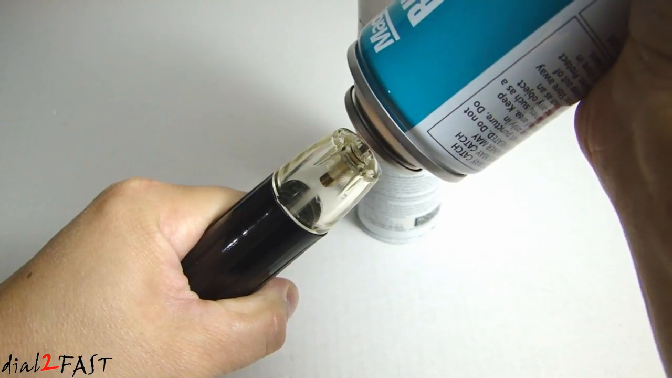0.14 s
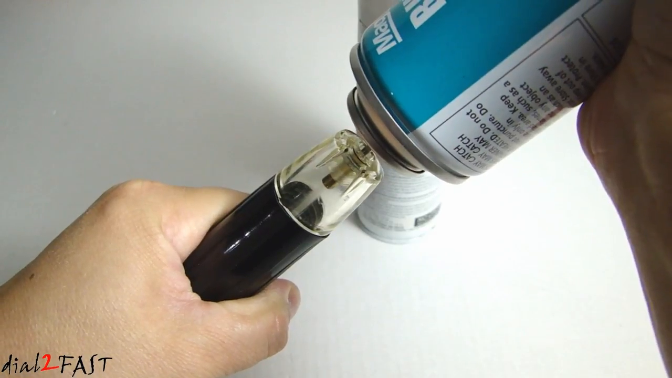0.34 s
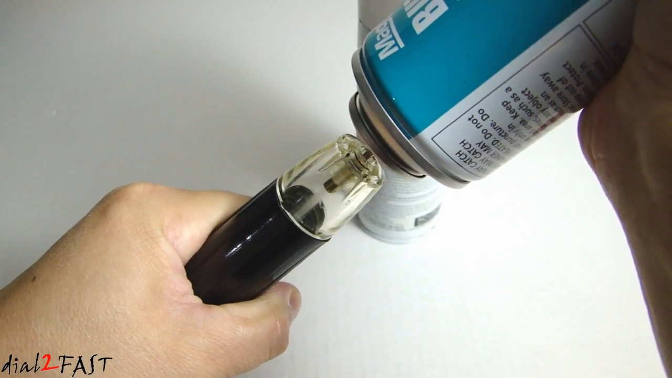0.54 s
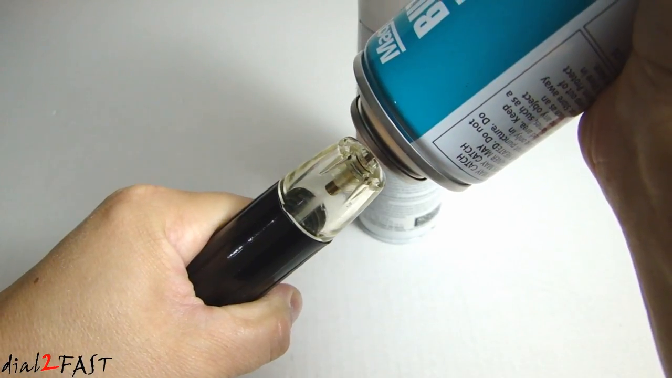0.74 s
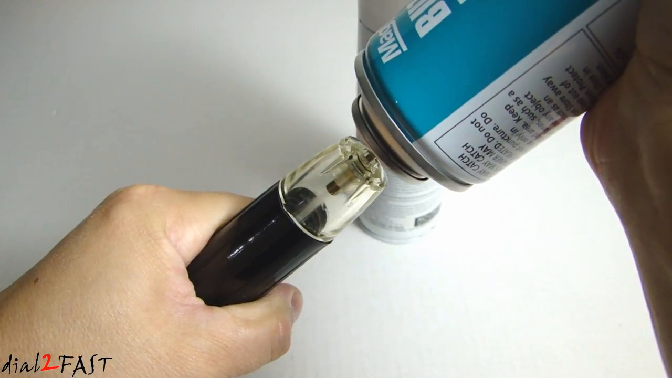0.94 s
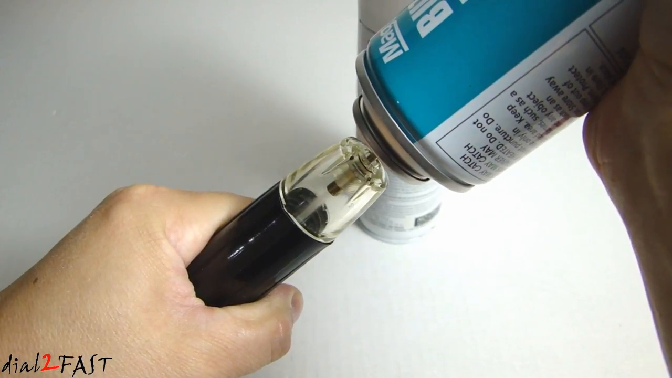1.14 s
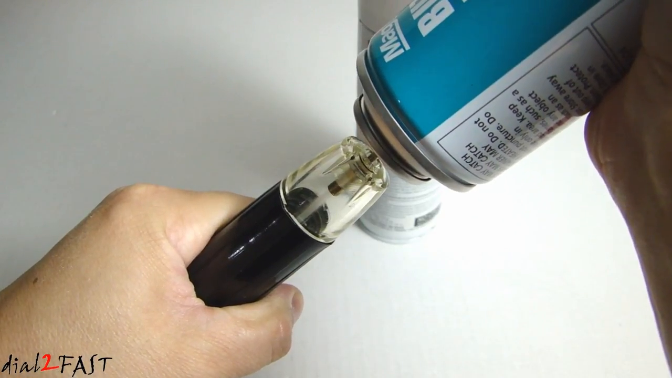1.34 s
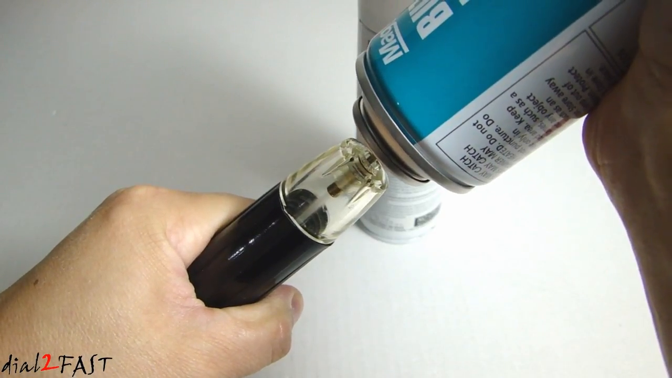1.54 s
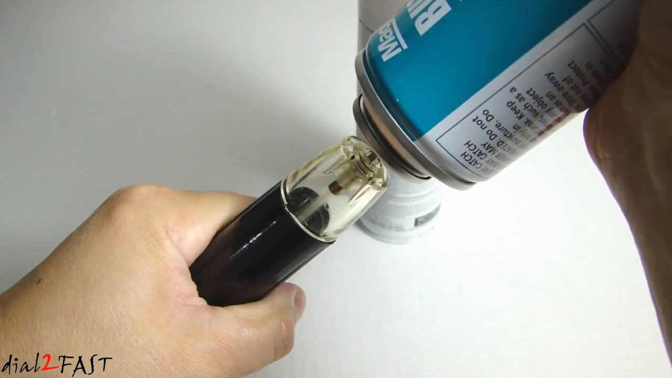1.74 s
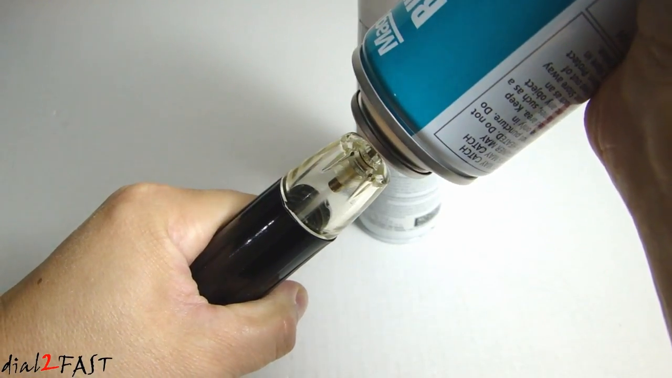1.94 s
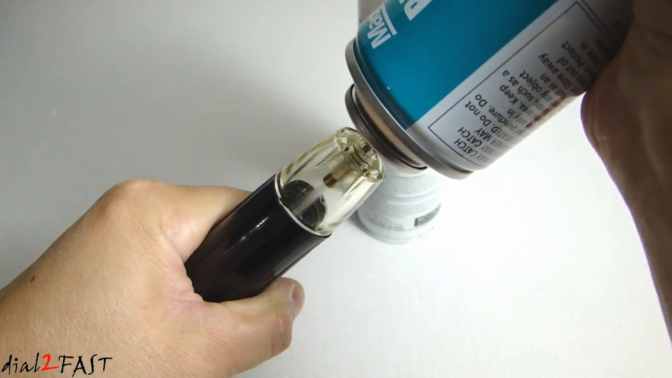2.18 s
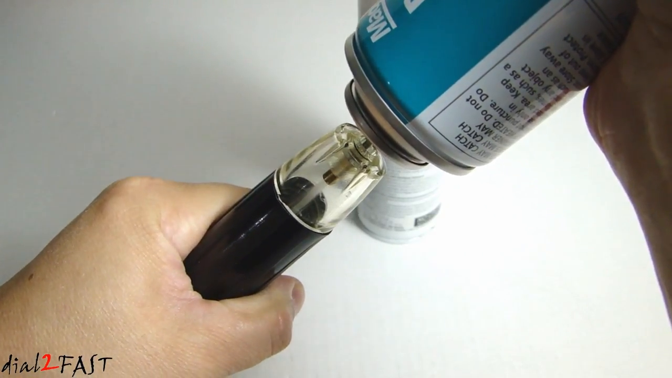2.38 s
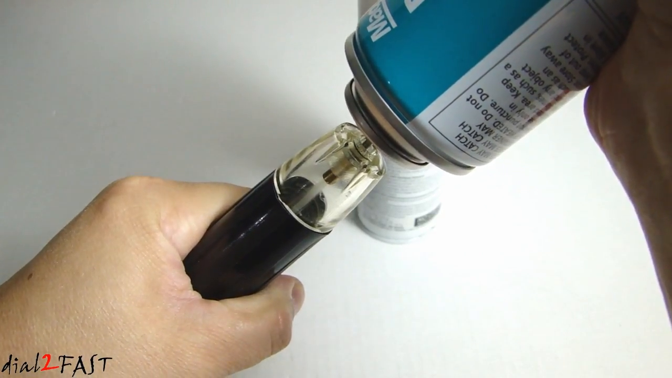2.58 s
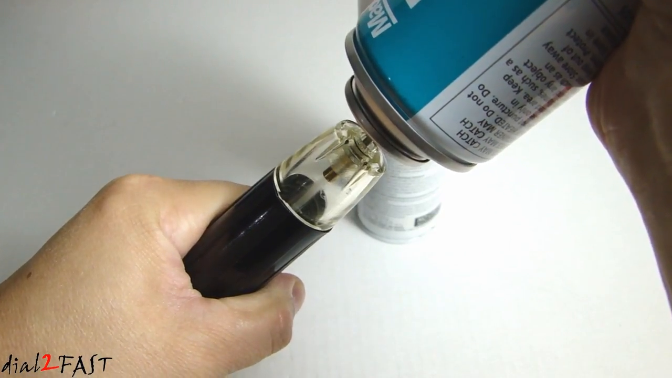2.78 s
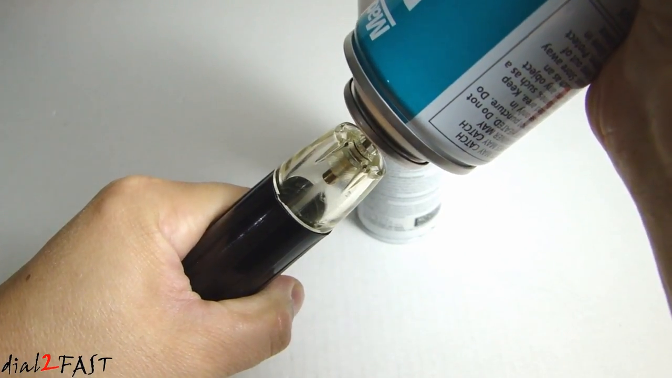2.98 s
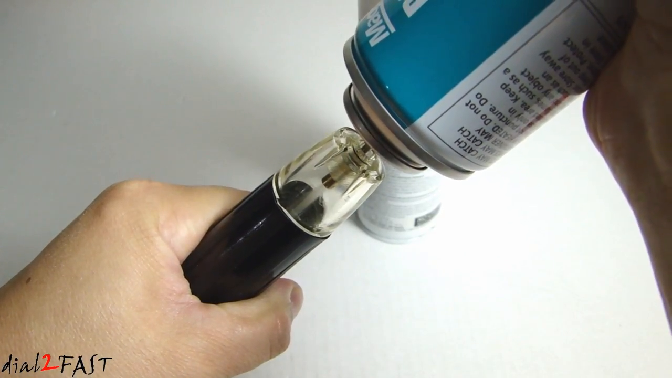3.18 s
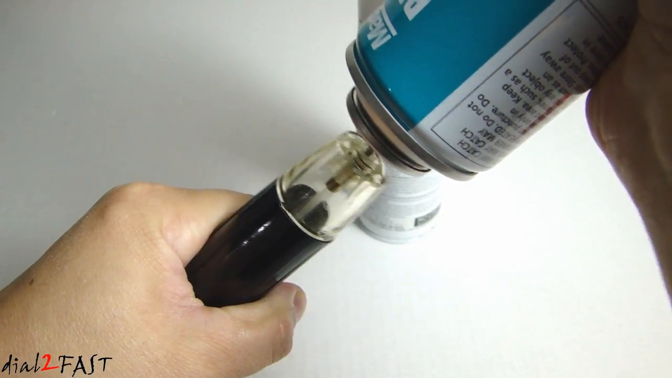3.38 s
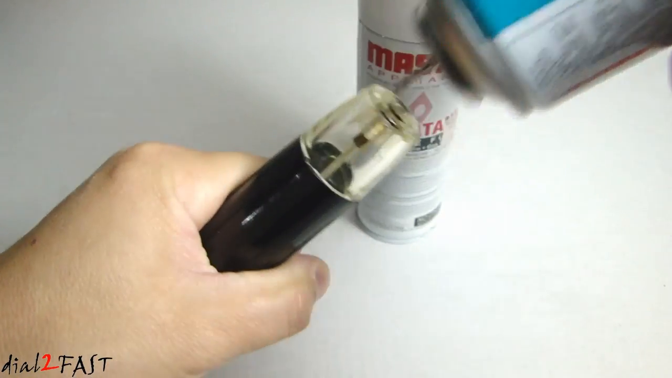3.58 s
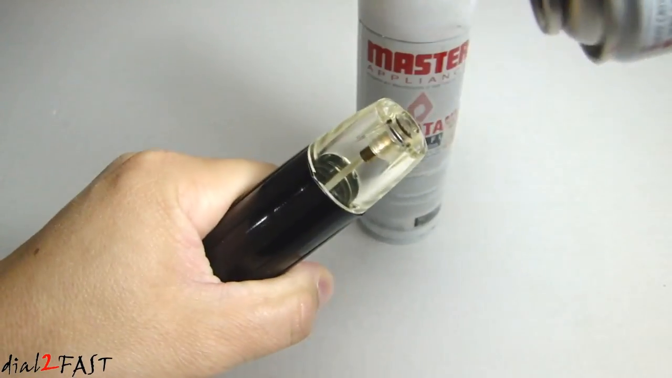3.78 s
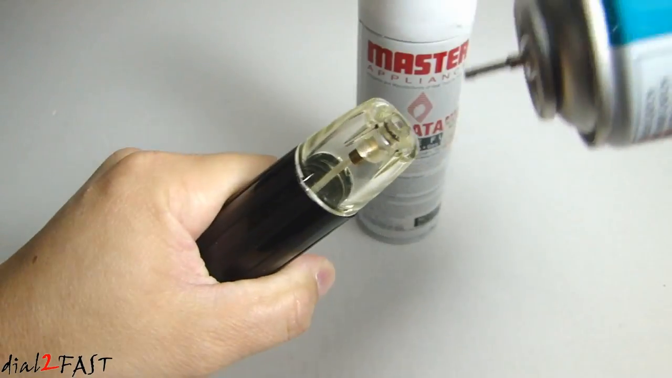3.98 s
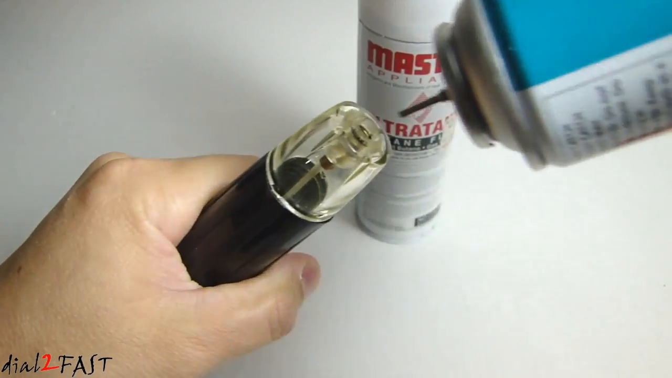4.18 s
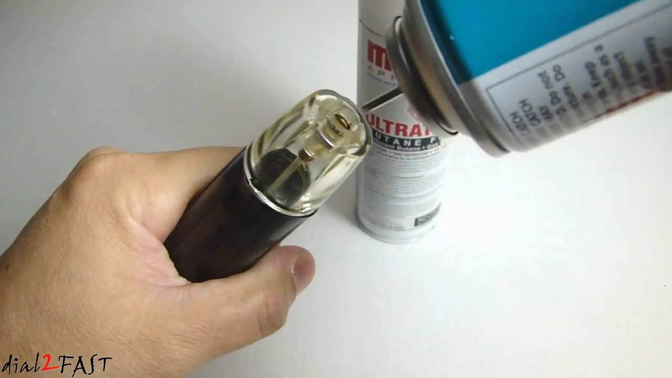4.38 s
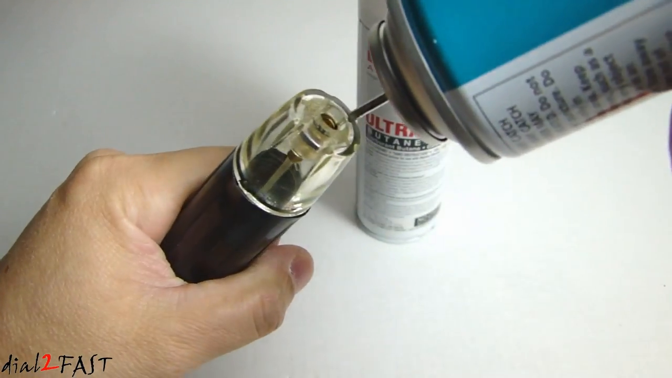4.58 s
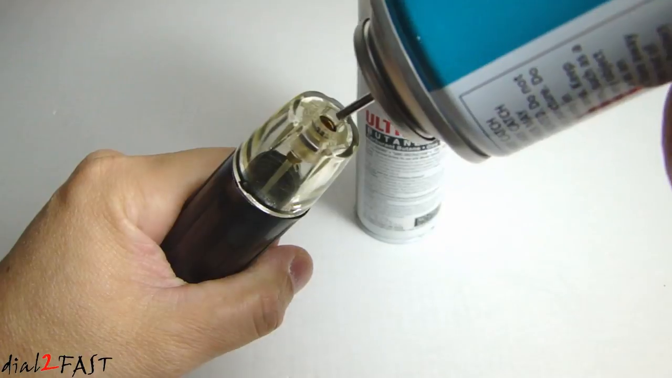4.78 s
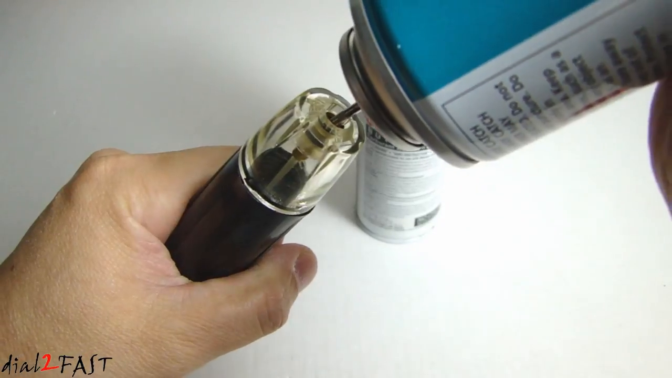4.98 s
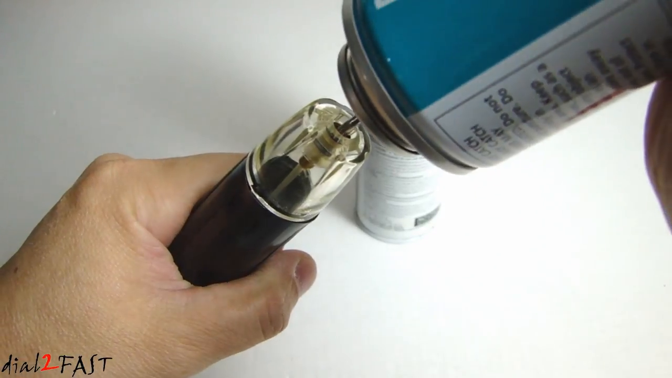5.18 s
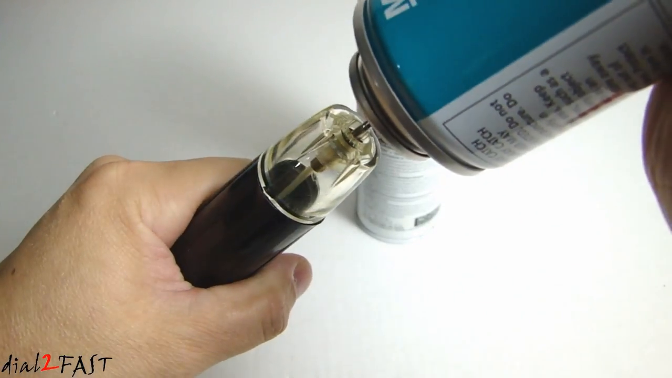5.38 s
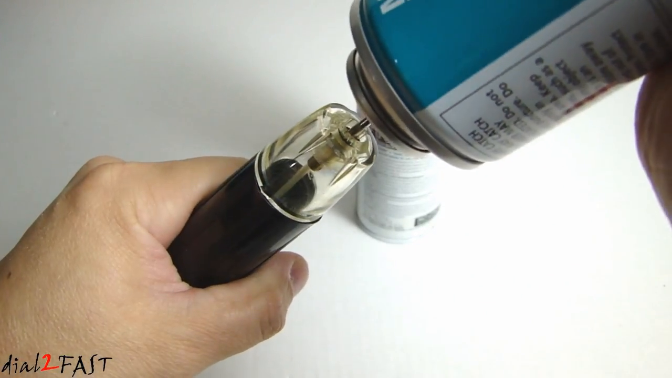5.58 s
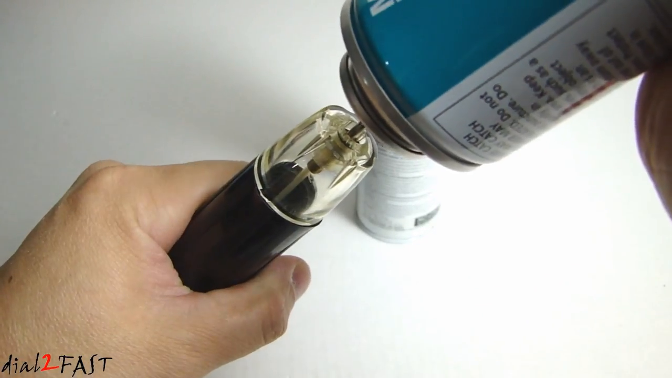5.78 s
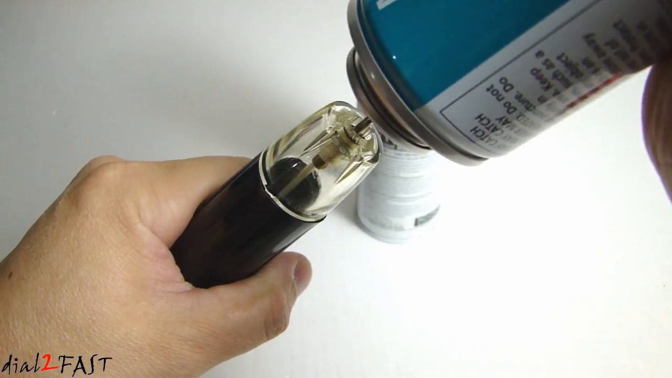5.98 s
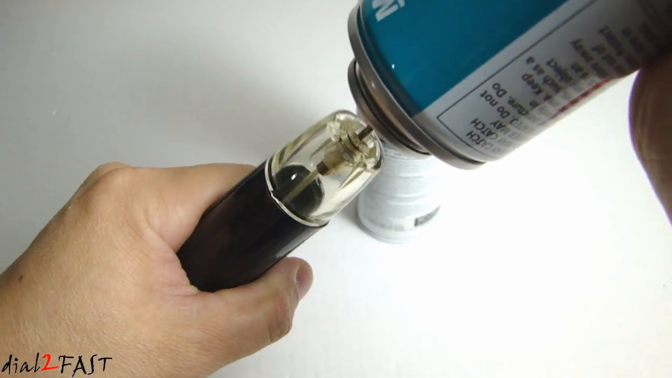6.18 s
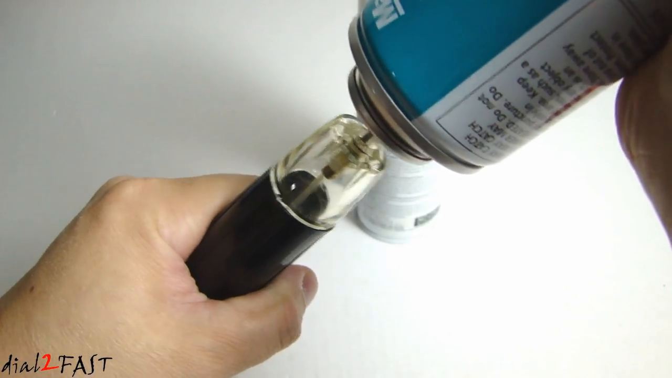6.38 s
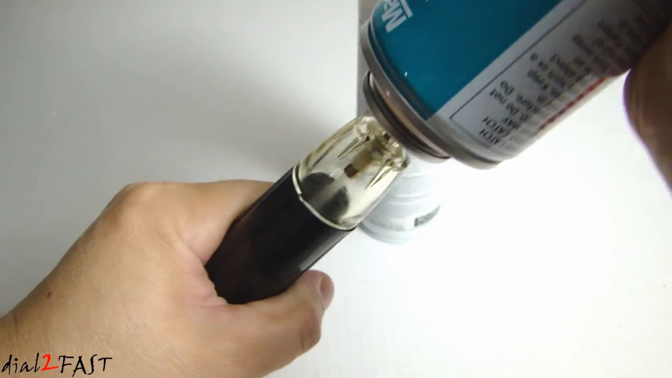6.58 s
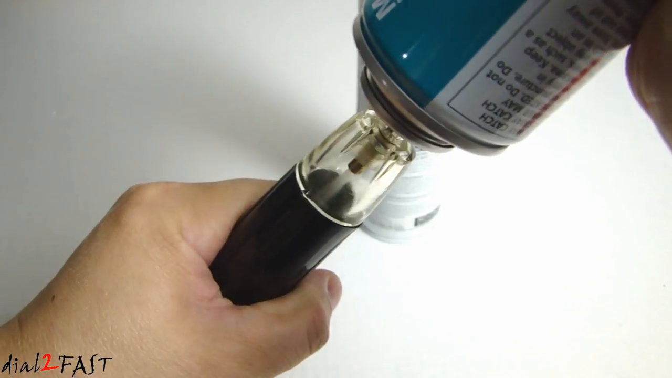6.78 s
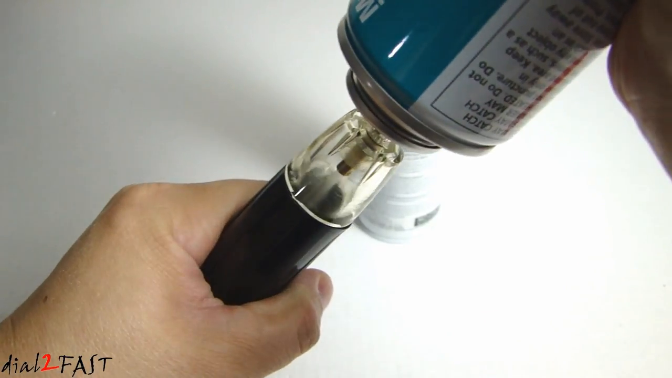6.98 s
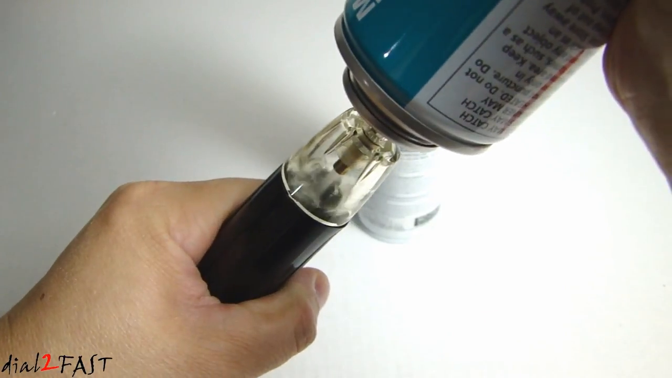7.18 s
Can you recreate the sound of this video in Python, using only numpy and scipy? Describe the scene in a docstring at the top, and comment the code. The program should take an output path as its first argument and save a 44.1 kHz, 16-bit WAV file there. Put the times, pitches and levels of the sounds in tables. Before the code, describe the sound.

Bright gas hiss from a can on a torch valve spurts and snaps off, soft taps follow in quiet, then hissing bursts back louder.

```python
"""In a quiet room, close to the microphone, a butane can is pressed onto the refill valve of a hand torch.
Gas leaks round the nozzle as a hiss: noise coloured by the small cavities that it rings.
It spurts as the can is pulled off, and the valve snaps shut with a crack and a short ring.
The nozzle taps its way back in, spurts again as it seats, and hisses louder when it is pushed home.
Drops of liquid gas puff now and then, and soft room noise lies underneath."""
import sys
import numpy as np
from scipy import signal
from scipy.fft import rfft, irfft
from scipy.io import wavfile

SR = 44100
rng = np.random.default_rng(int(sys.argv[2]) if len(sys.argv) > 2 else 0)


def put_to_file(sound):
    """Save the sound as 16-bit audio at rate SR, in the file named by the first command-line argument."""
    columns = np.atleast_2d(sound).T  # one column per channel
    safe = np.clip(columns, -1, 1)
    whole_steps = np.round(safe * 32767)
    wavfile.write(sys.argv[1], SR, whole_steps.astype(np.int16))


N = 319284
TIME = np.arange(N) / SR
FREQ = np.fft.rfftfreq(N, 1 / SR)
SIDES = np.array([[1], [-1]])  # left, right
TOP_HZ = 13150  # upper limit of the recorder
# moments shared by the leak and the spurts
PULL_OPEN_S, PULL_SHUT_S, SHUTTING_DB_PER_S = 3.554, 3.588, 899.5
SEEP_S = 6.322  # first touch of the second filling


def undb(db):
    """Turn decibels into gain."""
    return 10 ** (np.asarray(db) / 20)


def unit(x):
    """Scale to an rms (average strength) of 1."""
    return x / np.sqrt(np.mean(x ** 2))


def over_hz(points):
    """Join (frequency [Hz], value) points with straight lines on a log-frequency axis."""
    hz, value = np.transpose(points)
    return np.interp(np.log(FREQ + 1), np.log(hz), value)


def noise(gain):
    """Noise of rms 1, shaped by a gain at each frequency."""
    return unit(irfft(rfft(rng.standard_normal(N)) * gain, N))


def walk(rate_hz):
    """Smooth random drift of rms 1, mostly slower than the given rate."""
    return noise(1 / (1 + (FREQ / rate_hz) ** 2))


def ease(s, takes_s):
    """A smooth move of the hand from 0 to 1, half done at time s."""
    progress = np.clip((TIME - s) / takes_s + .5, 0, 1)
    return (1 + np.sin(np.pi * progress - np.pi / 2)) / 2


def burst(open_s, close_s, rise_db_per_s, fall_db_per_s):
    """Gain that rises to 1 at open_s, holds, and falls from close_s."""
    early = np.maximum(open_s - TIME, 0)
    late = np.maximum(TIME - close_s, 0)
    return undb(-rise_db_per_s * early - fall_db_per_s * late)


def decay(t, t60):
    """Fading gain that drops 60 dB in t60 seconds."""
    return np.exp(-np.log(1000) * t / t60)


def fade(s, t60):
    """Gain that starts at time s and drops 60 dB in t60 seconds."""
    return (TIME >= s) * decay(np.maximum(TIME - s, 0), t60)


def pan(left_minus_right_db):
    """Gains of left and right that differ by the given decibels."""
    return undb(SIDES * left_minus_right_db / 2)


# colour of the seated jet: (frequency [Hz], relative level [dB])
SEATED_COLOUR = [(100, -47.5), (160, -30.5), (250, -18), (500, -17.5), (1000, -15), (2200, -5.5),
                 (3200, 0.5), (6000, -8), (9000, -7.5), (11500, -11.5), (12700, -4.5), (13100, -18)]
# cavities round the seated nozzle: (frequency [Hz], width [Hz], lift [dB])
SEATED_CAVITIES = [(714, 250, 8), (1086, 204, 7.5), (1650, 470, 5.5), (3090, 90.0, 1), (3230, 140.0, 3),
                   (4010, 370, 6.5), (4310, 75, 6.5), (4750, 140.0, 9), (4990, 450, 5), (5500, 310, 7),
                   (6300, 590, 5.5), (7120, 190, 6), (7890, 530, 10.5), (9520, 360, 16.5), (10400, 60.0, 3),
                   (10070, 150.0, 6.5), (10307, 360, 19), (10740, 240.0, 12), (10807, 88, 12.0),
                   (11170, 150.0, 14.5), (11590, 400, 20.5), (12140, 230, 8), (12440, 170.0, 11.5)]
# colour of the jet when the can leans: (frequency [Hz], relative level [dB])
LEANING_COLOUR = [(100, -48), (160, -33), (250, -14), (500, -14.5), (1000, -6.5), (2200, -5), (3200, 0.5),
                  (6000, -5), (9000, -7.5), (11500, -2.5), (12700, -6), (13100, -5)]
# cavities round the leaning nozzle: (frequency [Hz], width [Hz], lift [dB])
LEANING_CAVITIES = [(1560, 800, 4.5), (3360, 110, 3.12), (3825, 91, 4.8), (4065, 150.0, 9.9),
                    (4440, 200, 2.6), (4790, 90.0, 6.1), (4980, 140, 9.6), (5780, 290.0, 4.0),
                    (6310, 130, 5.6), (7760, 534, 7.9), (9380, 250, 8.7), (9900, 170.0, 12.2),
                    (10170, 200, 17), (10330, 260, 3.9), (10900, 560, 3.1), (10950, 141, 10.8),
                    (11640, 300, 8.9), (12251, 200.0, 9.74)]
# colour of the jet when pushed home: (frequency [Hz], relative level [dB])
PUSHED_COLOUR = [(130, -57), (250, -20.5), (500, -6.5), (1000, -1.5), (2200, 0.5), (4500, 1.2),
                 (6600, -8.5), (8200, -19), (9000, -11), (11500, -1.1), (12700, -2.5), (13100, -14)]
# cavities round the pushed nozzle: (frequency [Hz], width [Hz], lift [dB])
PUSHED_CAVITIES = [(1100, 130, 4.6), (3300, 830, 3.5), (3920, 360, 8.3), (4770, 280, 10.3),
                   (5620, 270, 12.5), (6400, 503, 6.5), (7130, 560, 13.6), (7870, 600.0, 8.5),
                   (8510, 600.0, 17), (8850, 270, 8.3), (9335, 223, 20), (9540, 180, 17.9),
                   (10160, 540, 17.2), (10730, 300, 13.4), (11350, 180.0, 11), (11630, 380, 11),
                   (12500, 250.0, 12)]
# first filling: the leak sags as the tank fills, while the can creeps over and then tips to a lean
FIRST_DB, SAG_DB_PER_S = -28.5, 0.51
CREEP_PER_S, TIP_S, TIP_TAKES_S = 0.16, 2.14, 0.46  # lean runs from 0 to 1
# second filling: the leak builds up round the seated nozzle, and grows when the can is pushed home
SEATED_S, SEATING_TAKES_S, SECOND_DB, BUILD_DB_PER_S = 6.44, 0.039, -31.0, 4
HOME_S, HOME_TAKES_S, HOME_DB = 6.815, 0.18, 5.5


def leak(flutter_db=0.5, upright_pan_db=0.6, lean_pan_db=1.5, push_pan_db=0.3, second_lean=0.28):
    """The long hiss: leaning or pushing the can changes the cavities that the gas passes."""
    tip = ease(TIP_S, TIP_TAKES_S) * (1 - CREEP_PER_S * PULL_OPEN_S)
    first_lean = CREEP_PER_S * TIME + tip
    lean = np.clip(np.where(TIME < SEEP_S, first_lean, second_lean), 0, 1)
    push = ease(HOME_S, HOME_TAKES_S)
    upright = jet(SEATED_COLOUR, SEATED_CAVITIES) * pan(upright_pan_db)
    leaning = jet(LEANING_COLOUR, LEANING_CAVITIES) * pan(lean_pan_db)
    pushed = jet(PUSHED_COLOUR, PUSHED_CAVITIES) * pan(push_pan_db)
    # square roots keep the power steady while one hiss blends into another
    seated = np.sqrt(1 - lean) * upright + np.sqrt(lean) * leaning
    gas = np.sqrt(1 - push) * seated + np.sqrt(push) * pushed
    first = undb(FIRST_DB - SAG_DB_PER_S * TIME) * burst(0, PULL_OPEN_S, 0, SHUTTING_DB_PER_S)
    second_db = SECOND_DB + BUILD_DB_PER_S * (TIME - SEATED_S) + HOME_DB * push
    second = undb(second_db) * ease(SEATED_S, SEATING_TAKES_S)
    return gas * (first + second) * undb(flutter_db * walk(rate_hz=22))


# colour of the jet when pulled off: (frequency [Hz], relative level [dB])
PULL_COLOUR = [(130, -44), (400, -24), (900, -9.5), (1400, -16.5), (1900, -8), (3700, 1.5), (4800, -3),
               (6500, -6), (7600, 3), (9000, -1), (12000, -3), (13100, -17)]
# colour of the jet on the way in: (frequency [Hz], relative level [dB])
ENTRY_COLOUR = [(130, -36), (300, -10.5), (800, -3.5), (1500, -3), (3000, 0.5), (4500, 1), (6800, -4.5),
                (9000, -0.5), (12000, 2), (13100, -4)]
# cavities round the half-open gap: (frequency [Hz], width [Hz], lift [dB])
GAP_CAVITIES = [(3250, 400, 6), (4055, 280.0, 7), (5600, 300, 6), (7480, 800.0, 4), (8700, 400, 14),
                (9660, 680, 14), (10400, 330.0, 3.9), (10520, 570, 11.3), (11270, 560, 10.6),
                (12160, 510, 13)]
# pulling off: the gap opens, the gas bursts out until the valve shuts, and the nozzle drains
PULL_DB, OPENING_DB_PER_S, EMPTYING_DB_PER_S = -16, 340.5, 75.5
DRAIN_DB, DRAIN_T60_S = -40.5, 0.42
# pushing on: gas seeps at first touch, bursts as the valve opens, and dies down as the nozzle seats
SEEP_DB, SEEP_RISE_DB_PER_S = -42, 518
ENTRY_OPEN_S, ENTRY_SEATING_S, ENTRY_DB = 6.369, 6.384, -16.5
BURST_DB_PER_S, SEATING_DB_PER_S = 2000, 141


def spurts(pull_pan_db=1.1, entry_pan_db=0.7, sputter_db=1.0):
    """While the nozzle is half in, gas bursts unevenly through the open gap."""
    pull = undb(PULL_DB) * burst(PULL_OPEN_S, PULL_OPEN_S, OPENING_DB_PER_S, EMPTYING_DB_PER_S)
    pull = pull * burst(0, PULL_SHUT_S, 0, SHUTTING_DB_PER_S)
    drain = undb(DRAIN_DB) * fade(PULL_SHUT_S, DRAIN_T60_S)
    seep = undb(SEEP_DB) * burst(SEEP_S, ENTRY_OPEN_S, SEEP_RISE_DB_PER_S, SEATING_DB_PER_S)
    entry = undb(ENTRY_DB) * burst(ENTRY_OPEN_S, ENTRY_SEATING_S, BURST_DB_PER_S, SEATING_DB_PER_S)
    leaving = jet(PULL_COLOUR, GAP_CAVITIES) * np.hypot(pull, drain) * pan(pull_pan_db)
    entering = jet(ENTRY_COLOUR, GAP_CAVITIES) * np.hypot(seep, entry) * pan(entry_pan_db)
    return (leaving + entering) * undb(sputter_db * walk(rate_hz=90))


# likeness of left and right in the hiss, clipped to -0.9 to 0.9 before use as a correlation:
# (frequency [Hz], likeness setting [no unit])
LIKENESS = [(300, 1.5), (700, 1.2), (1400, .62), (3200, 0.5), (6500, 0.1), (10500, 0.45)]
# balance of the hiss: (frequency [Hz], left minus right [dB])
BALANCE = [(250, -5.5), (700, -2), (1500, -2.5), (3400, -5.5), (6500, -1.6), (10500, -1.5), (12300, -3.5)]


def jet(colour, cavities, scatter=.45):
    """Turbulence lifted by cavity resonances; echoes off can, hands and table make the capsules differ."""
    db = over_hz(colour)
    for hz, width, lift in cavities:
        db = db + lift / (1 + (2 * (FREQ - hz) / width) ** 2)
    mid, stray = rfft(rng.standard_normal((2, N))) * undb(db)
    near_echoes = rng.standard_normal(N) * fade(.002, .035)
    # the echoes turn the phase of the difference signal and leave the colour as it is
    turned = mid * np.exp(1j * np.angle(rfft(near_echoes)))
    side = (turned + scatter * stray) / np.hypot(1, scatter)
    likeness = np.clip(over_hz(LIKENESS), -.9, .9)
    pair = mid + SIDES * side * np.sqrt((1 - likeness) / (1 + likeness))
    return irfft(pair * pan(over_hz(BALANCE)), N) / np.std(irfft(mid, N))


# drops of liquid gas spitting at the nozzle: (time [s], level [dB], pitch [Hz])
DROPS = [(.148, -21, 10300), (.215, -24, 10300), (2.339, -21, 10200), (3.414, -26, 10000),
         (3.823, -41, 7600), (3.832, -40, 7800), (3.847, -42, 7800)]


def spits(width_hz=2600, t60=0.032):
    """Each drop flashes to gas in a short, high puff."""
    out = np.zeros((2, N))
    for s, db, hz in DROPS:
        band = 1 / np.hypot(1, (FREQ - hz ** 2 / (FREQ + 1)) / width_hz)
        puff = np.array([noise(band), noise(band)])
        out += undb(db) * fade(s, t60) * puff
    return out


# the sprung valve snapping back, level before filtering:
# (time [s], level [dB], left minus right [dB], treble edge [Hz], favoured ring [Hz])
VALVE_SNAPS = [(3.5818, -16, -5, 6000, 5530), (3.6468, -26.5, -4, 8000, 5450),
               (3.6684, -19, -2, 9000, 5270), (3.6712, -24.5, -4.5, 9000, 4200)]
# ring of the valve: (frequency [Hz], relative level [dB], time to fall 60 dB [s])
VALVE_RING = [(2640, -11.5, 0.018), (3188, 2.5, 0.018), (4360, -1.5, 0.0088), (4560, -6.5, 0.018),
              (4800, -9.5, 0.016), (5430, 2.5, 0.029), (5520, -0.5, 0.02), (8100, -4, .018),
              (9500, -10, .014), (10910, -14.5, .014)]


def valve_snaps():
    """The sprung valve snaps back with a bright crack and ring."""
    return knocks(VALVE_SNAPS, VALVE_RING, crack_db=-1.0, crack_t60=0.046, low_hz=2500)


# the nozzle scraping as it slides out at 3.641 s, then knocking on the torch's plastic base, level before
# filtering: (time [s], level [dB], left minus right [dB], treble edge [Hz], favoured ring [Hz])
NOZZLE_TAPS = [(3.641, -41, -9, 4500, 2300), (4.1912, -48, -10, 9020, 3200),
               (4.5646, -36.5, -12, 4160, 2300), (4.9565, -38, -6, 5000, 3300),
               (4.9757, -29.5, -2, 5800, 5000), (4.9776, -27.5, -4, 6550, 4500),
               (5.067, -35.5, -10, 4000, 3700), (5.0832, -37, -9, 4100, 3800)]
# ring of the base: (frequency [Hz], relative level [dB], time to fall 60 dB [s])
BASE_RING = [(1400, -20, 0.0044), (1970, -5, 0.016), (2330, 1, 0.023), (2800, 5, 0.0091), (3240, -1, 0.011),
             (3830, 2, 0.017), (4370, -3, 0.015), (4880, 4, 0.016), (5500, -11, 0.0082)]


def nozzle_taps():
    """The nozzle scrapes as it slides out, then knocks on the plastic base and rebounds, ringing it each time."""
    return knocks(rebounding(NOZZLE_TAPS), BASE_RING, crack_db=1.0, crack_t60=0.027, low_hz=1080)


def rebounding(hits, first_gap_s=0.0072, gap_keep=0.7, loss_db=11, scatter=0.22, count=2):
    """Follow each knock with ever weaker rebounds, at uneven gaps that tend to shrink."""
    rows = []
    chances = rng.standard_normal((len(hits), count))
    for (s, db, *contact), chance in zip(hits, chances):
        gaps = first_gap_s * gap_keep ** np.arange(count) * np.exp(scatter * chance)
        delays = [0, *np.cumsum(gaps)]
        for k, late in enumerate(delays):
            rows.append((s + late, db - loss_db * k, *contact))
    return rows


def knocks(hits, modes, crack_db, crack_t60, low_hz, favour_db=5, favour_width_hz=350, size=8192):
    """Each contact cracks and rings the modes, with its own treble edge."""
    out = np.zeros((2, N + size))
    t = np.arange(size) / SR
    hz, mode_db, t60 = np.transpose(modes)[:, :, None]
    for s, db, pan_db, edge_hz, favoured_hz in hits:
        # the point of contact favours some of the modes
        favour = favour_db / (1 + ((hz - favoured_hz) / favour_width_hz) ** 2)
        weight = undb(mode_db + favour)
        weight = weight / np.sqrt(np.sum(weight ** 2) / 2)
        # every mode reaches the two capsules up to half a turn apart
        turns = rng.random((len(modes), 1)) + rng.random((2, len(modes), 1)) / 2
        waves = np.sin(2 * np.pi * (hz * t + turns))
        ring = np.sum(weight * waves * decay(t, t60), axis=1)
        crack = undb(crack_db) * rng.standard_normal((2, size)) * decay(t, crack_t60)
        band = [low_hz, min(edge_hz, TOP_HZ)]
        contact = signal.butter(2, band, "bandpass", fs=SR, output="sos")
        start = int(s * SR)
        out[:, start:start + size] += undb(db) * pan(pan_db) * signal.sosfilt(contact, ring + crack)
    return out[:, :N]


def room(x, wet_db=-13.0, t60=0.28, treble_t60=0.18, treble_hz=6500, gap_s=.005):
    """A small room answers with a short diffuse tail, different at each capsule; its treble dies first."""
    echoes = rng.standard_normal((2, N))
    lows = irfft(rfft(echoes) / (1 + (FREQ / treble_hz) ** 4), N)
    tail = lows * fade(gap_s, t60) + (echoes - lows) * fade(gap_s, treble_t60)
    tail = tail[:, :SR // 2] / np.sqrt(np.sum(tail ** 2) / 2)
    return x + undb(wet_db) * signal.fftconvolve(x, tail, axes=1)[:, :N]


# room noise that the two capsules share: (frequency [Hz], relative level [dB])
SHARED_AIR = [(15, -59), (25, -14.5), (86, -27), (160, -5), (316, 1), (370, 2), (507, 1.5), (833, 0),
              (901, 0), (1410, -3.5), (2310, -5.5), (2570, -6.5), (5200, -12), (10500, -16.5),
              (13000, -28.5)]
# room noise in opposite phase at the two capsules: (frequency [Hz], relative level [dB])
OPPOSED_AIR = [(30, -34), (60, -24.5), (100, -30.5), (180, -10), (320, -3), (600, -3), (1100, -6),
               (2200, -12), (5000, -21.5), (10500, -28.5), (13000, -38.5)]


def room_noise(shared_db=-58, opposed_db=-52):
    """Soft steady air noise, wide because its lows reach the capsules mostly in opposite phase."""
    shared = undb(shared_db) * noise(undb(over_hz(SHARED_AIR)))
    opposed = undb(opposed_db) * noise(undb(over_hz(OPPOSED_AIR)))
    return shared + SIDES * opposed


def scene():
    """Gas and handling sounds in the room, over its background."""
    gas = leak() + spurts() + spits()
    handling = valve_snaps() + nozzle_taps()
    return room(gas + handling) + room_noise()


def record(dry):
    """The recorder cuts the top steeply."""
    return signal.sosfilt(signal.ellip(10, .2, 80, TOP_HZ, fs=SR, output="sos"), dry)


dry = scene()
out = record(dry)
put_to_file(out)
```